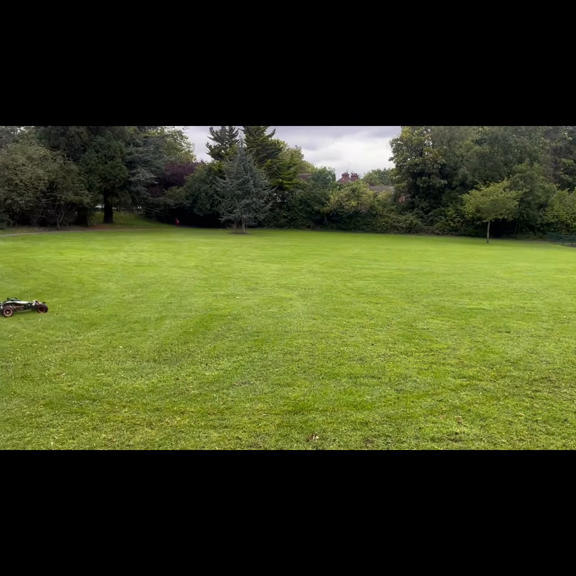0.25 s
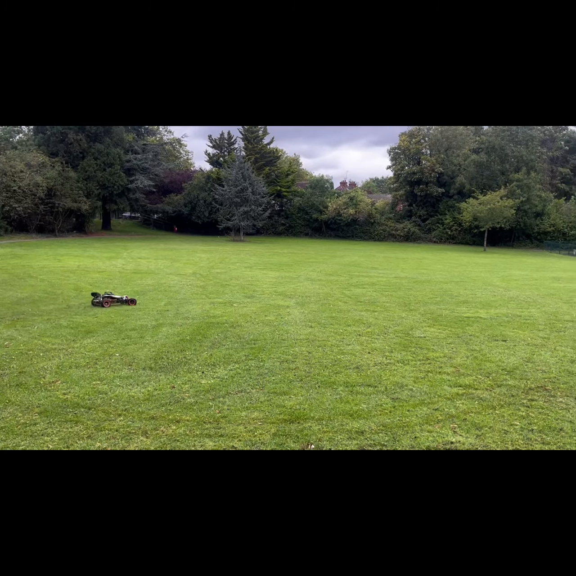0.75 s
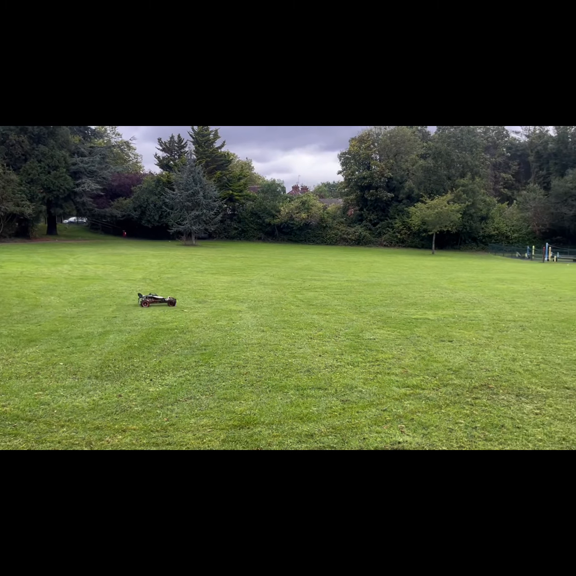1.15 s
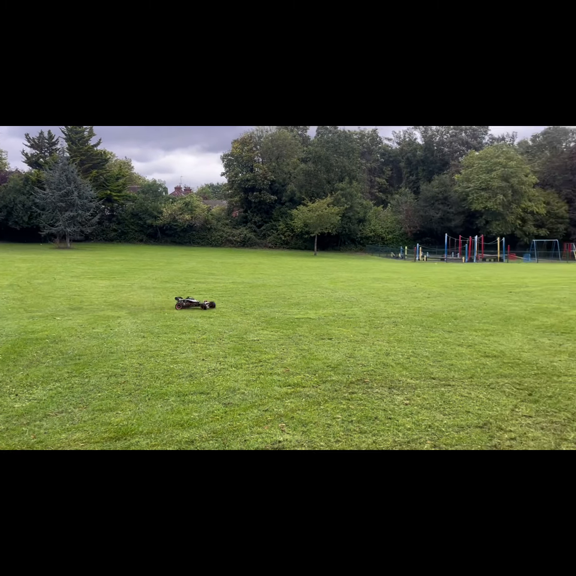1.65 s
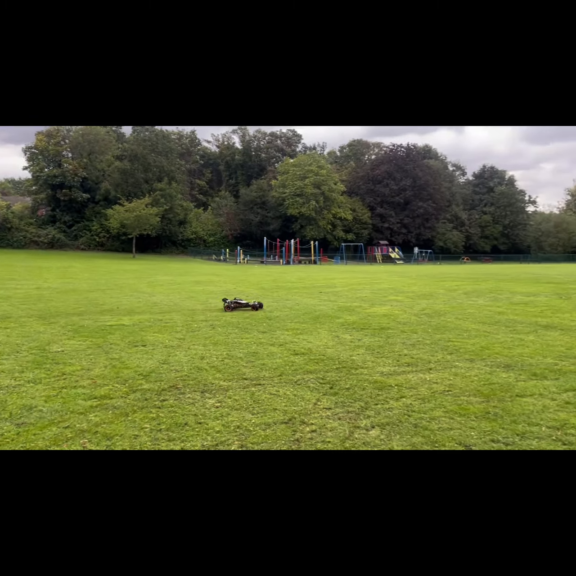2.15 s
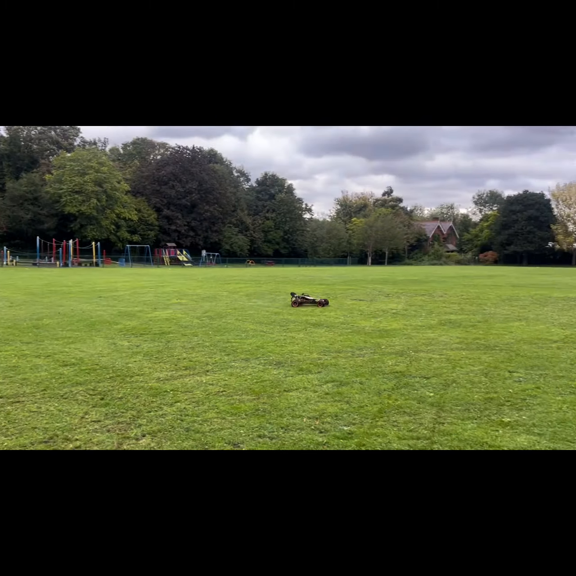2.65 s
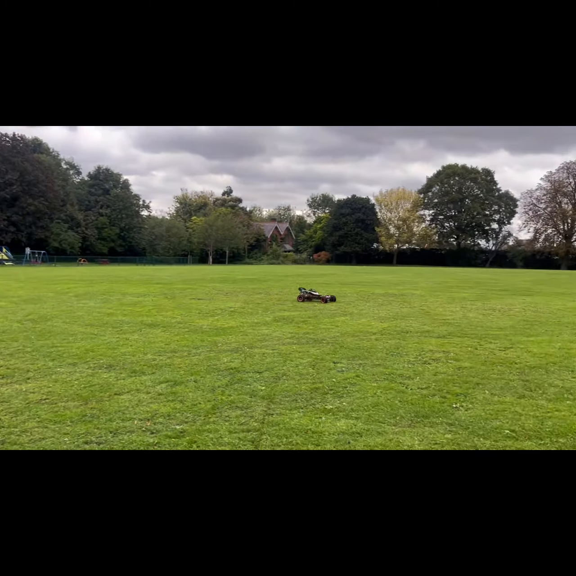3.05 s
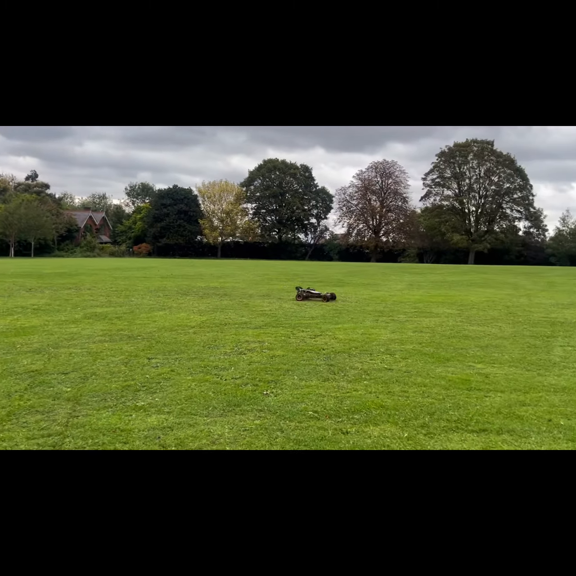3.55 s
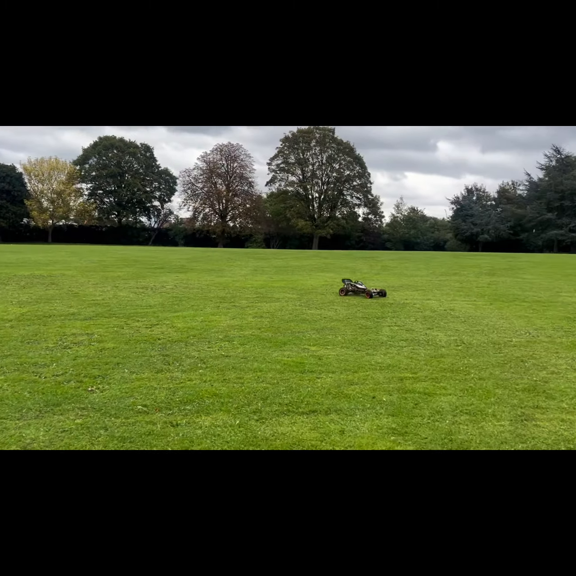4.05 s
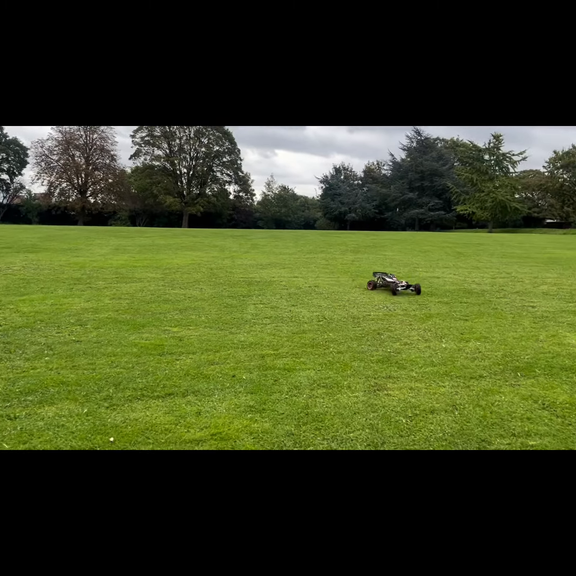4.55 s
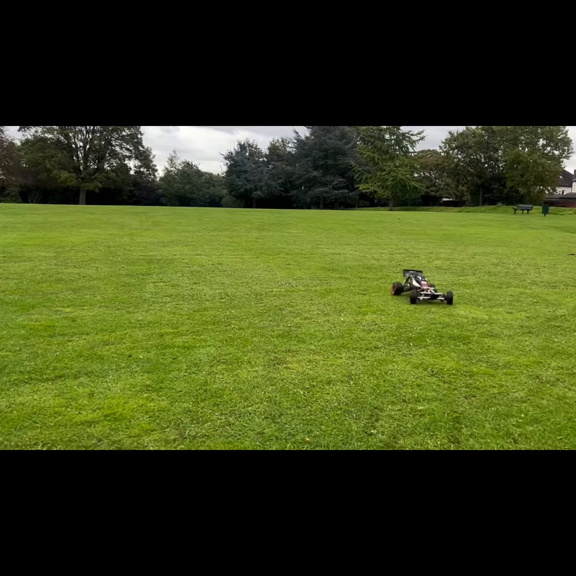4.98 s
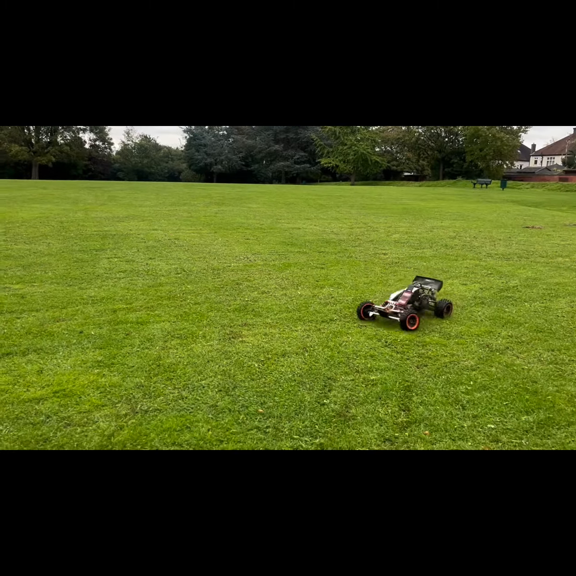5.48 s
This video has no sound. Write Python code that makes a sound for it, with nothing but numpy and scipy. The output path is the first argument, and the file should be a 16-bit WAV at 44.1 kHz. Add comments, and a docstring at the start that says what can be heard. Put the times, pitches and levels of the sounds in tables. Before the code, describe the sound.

Out in a field, the little petrol engine of a model buggy buzzes hard, eases off, then pulls up to its highest whine. It falls back, firing weakly and popping, gives three shorter barks of throttle, sputters again and opens up once more at the end. The sound is heard through a phone microphone, with a slight dull echo and faint far-off traffic underneath.

```python
"""Two-stroke model buggy on grass

A small petrol engine revs in six bursts as the buggy circles a field. Each firing cracks through the
resonances of the tuned pipe, which barks while revving up and howls under load. With the throttle shut
the engine coasts down, firing weakly and unevenly, with a few pops. The tree line answers faintly and
distant traffic hums. A phone's two microphone ports pick it up."""
import sys
import numpy as np
from scipy import signal
from scipy.fft import rfft, irfft, next_fast_len
from scipy.io import wavfile
from scipy.ndimage import map_coordinates

SR = 44100
rng = np.random.default_rng(int(sys.argv[2]) if len(sys.argv) > 2 else 0)


def to_wav(sig):
    """Store sig (one row per channel, or 1-D mono) as 16-bit WAV at the path in sys.argv[1].

    Samples outside -1..1 are clipped; the rate is SR.
    """
    pcm = np.clip(np.atleast_2d(sig), -1, 1) * 32767
    pcm = np.round(pcm).astype(np.int16)
    wavfile.write(sys.argv[1], SR, pcm.T)  # frames by channels


N = 252252


def amp(db):
    """Decibels to gain."""
    return 10 ** (np.asarray(db) / 20)


def unit(x):
    """Scaled to rms 1."""
    return x / np.sqrt(np.mean(x ** 2) + 1e-20)


def log_interp(hz_points, values, hz):
    """Values read on a log-frequency axis."""
    return np.interp(np.log(hz + 1), np.log(np.asarray(hz_points) + 1), values)


def curves(rows):
    """One value per sample for each column after the time."""
    times_s, *columns = np.transpose(rows)
    return [np.interp(np.arange(N) / SR, times_s, column) for column in columns]


def wobble(knots_per_s):
    """A smooth random curve."""
    knots = rng.standard_normal(int(N * knots_per_s / SR) + 4)
    return map_coordinates(knots, [np.arange(N) * knots_per_s / SR])


def filtered(x, response):
    """x through a complex frequency response."""
    size = next_fast_len(N + SR // 2)
    return irfft(rfft(x, size) * response(np.fft.rfftfreq(size, 1 / SR)), size)[..., :N]


def spikes(positions, sizes):
    """Band-limited pulses at fractional sample positions."""
    taps = np.floor(positions)[:, None] + np.arange(-7, 9)
    offset = taps - positions[:, None]
    shapes = sizes[:, None] * np.sinc(offset) * np.cos(np.pi * offset / 16) ** 2
    return np.bincount(np.clip(taps, 0, N).astype(int).ravel(), shapes.ravel(), N + 1)[:N]


def buggy():
    """One crankshaft drives the exhaust and the single voices of pipe and shell."""
    throttle, speed_hz, levels_db = driving()
    turns, clutch = crank(throttle, speed_hz)
    pulses = firings(turns, throttle)
    crack_db = levels_db[0]
    revving = throttle * np.clip((169.5 - speed_hz) / 20, 0, 1)  # gone by 169.5 Hz
    return (exhaust(pulses, turns, throttle, clutch, levels_db)
            + pipe_bark(pulses, revving, crack_db)
            + pipe_ring_on(pulses, throttle, crack_db)
            + pipe_howl(turns, speed_hz, loaded=throttle - revving)
            + shell(pulses))


# Each entry: time in seconds at which the throttle is fully open.
OPENINGS_S = [-.047, 1.036, 3.051, 3.7645, 4.363, 5.351]
# One burst per opening. Each row: time open in seconds, starting speed in Hz, opening crack offset
# in dB, quick speed drop on shutting in Hz, time constants of drop and coast in seconds, coasting
# crack at first and settled in dB, coasting thump, ring and hiss in dB over the crack.
BURSTS = [(.69, 103, 2, 18, 0.033, .39, -42.5, -56, -2.5, 5, -7),
          (1.222, 103, -15, 49, 0.08, 0.97, -35, -47, -9.5, -1.5, -11),
          (.442, 120, -13.5, 38, 0.049, 0.25, -42.5, -52, -7, -2, -8),
          (.134, 114, -9.5, 19, 0.07, 0.46, -46, -51.5, -6, 0.5, -8),
          (.232, 102, -17, 16, .04, 0.43, -46.5, -49.5, -2, 3, -22),
          (.5, 94, -13.5, 18, .04, .4, -45, -50, 0, 0, -15)]
# Each row: time in seconds, speed in Hz at which clutch and wheels hold the open engine.
HELD_SPEED = [(.07, 173.9), (.64, 170.7), (1.14, 172.9), (1.31, 171.3), (1.53, 180.2), (1.558, 189.2),
              (1.69, 199), (1.838, 201.4), (1.888, 210.1), (1.938, 206.9), (1.988, 217.3), (2.014, 208.5),
              (2.046, 231.1), (2.07, 226), (2.1, 231), (2.24, 234.6), (3.15, 170), (3.338, 182.4),
              (3.404, 189.7), (3.49, 195.6), (3.86, 169.8), (3.896, 166.1), (4.47, 176.4), (4.56, 175.3),
              (4.598, 166.5), (5.47, 175.6), (5.72, 176.2)]
# Open throttle. Each row: time in seconds, crack drive in dB, thump, ring and hiss in dB over it.
POWER_LEVELS = [(.1, -19.5, -13, -9, -6.5), (.37, -19.5, -15, -9.5, -10.5), (.55, -21.5, -11, -7, -6),
                (.65, -24.5, -18.5, -10, -9), (1.16, -21, -14, -10, -1.5), (1.38, -24.5, -11, -8.5, -7),
                (1.57, -24, -10.5, -7.5, -9), (1.88, -24, -7.5, -8.5, -12), (2.22, -17, -12, -12.5, -15),
                (2.26, -22, -16, -12, -12), (3.16, -26.5, -9, -4, -9), (3.48, -24, -12, -8, -8.5),
                (3.8, -27, -15, -8, -11), (3.89, -28.5, -15, -4.5, -7), (4.4, -22, -12.5, -9.5, -19),
                (4.51, -21.5, -14, -11, -9.5), (4.59, -24.5, -16.5, -13, -10),
                (5.46, -19.5, -7.5, -6.5, -14.5), (5.71, -25.5, -2.5, 3, -7)]
# Extra thump, ring and hiss in dB just after an opening.
SWELL_DB = [4.5, 6, 5]
def driving():
    """Throttle 0-1, crank speed and four drive levels: the engine climbs, is held, then coasts down."""
    climb_hz_per_s, knee_hz, idle_hz = 710, 3, 72.36
    open_s, shut_s, swell_s, sink_s = .0081, .024, .042, .24
    t = np.arange(N) / SR
    held_hz, = curves(HELD_SPEED)
    power_db = np.array(curves(POWER_LEVELS))
    throttle, speed_hz, levels_db = np.zeros(N), np.zeros(N), np.zeros((4, N))
    for start_s, burst in zip(OPENINGS_S, BURSTS):
        held_s, start_hz, first_db, drop_hz, drop_s, coast_s, from_db, to_db, *tone_db = burst
        age_s = t - start_s
        closed_s = np.maximum(age_s - held_s, 0)
        climb_hz = start_hz + climb_hz_per_s * age_s
        driven_hz = -knee_hz * np.logaddexp(-climb_hz / knee_hz, -held_hz / knee_hz)  # soft minimum
        top_hz = np.interp(start_s + held_s, t, driven_hz)
        coast_hz = idle_hz + drop_hz * np.exp(-closed_s / drop_s)
        coast_hz += (top_hz - drop_hz - idle_hz) * np.exp(-closed_s / coast_s)
        burst_hz = np.where(closed_s > 0, coast_hz, driven_hz)
        speed_hz = np.where(age_s < 0, np.maximum(speed_hz, driven_hz), burst_hz)
        opened = np.clip(age_s / open_s + 1, 0, 1) * np.clip(1 - closed_s / shut_s, 0, 1)
        loud_db = power_db + np.outer([first_db, *SWELL_DB], np.exp(-np.maximum(age_s, 0) / swell_s))
        sinking_db = to_db + (from_db - to_db) * np.exp(-closed_s / sink_s)
        quiet_db = np.array([sinking_db] + [np.full(N, db) for db in tone_db])
        levels_db = opened * loud_db + (1 - opened) * np.where(age_s < 0, levels_db, quiet_db)
        throttle = np.maximum(throttle, opened)
    levels_db[0] += 1.3 * (1 - throttle) * wobble(77)  # the coasting engine catches and misses
    return throttle, speed_hz, levels_db


def crank(throttle, speed_hz, grip_hz=175):
    """Crankshaft turns so far and clutch grip 0-1; bumps shake the speed while the clutch grips."""
    t = np.arange(N) / SR
    clutch = throttle * np.clip((speed_hz - grip_hz) / 8, 0, 1)
    turns = np.cumsum(speed_hz * (1 + .012 * clutch * wobble(50))) / SR + .5
    for start_s in OPENINGS_S[1:]:  # ease the phase so a firing lands on the opening
        phase = turns[round(start_s * SR)]
        turns += (np.round(phase) - phase) * np.clip((t - start_s) * 4 + 1, 0, 1)
    return turns, clutch


def firings(turns, throttle):
    """One pressure pulse a turn; a lean coasting charge burns less evenly."""
    positions = np.interp(np.arange(1, int(turns[-1]) + 1), turns, np.arange(N))
    chance = rng.standard_normal((2000, 2))[:len(positions)]
    shut = 1 - throttle[positions.astype(int)]
    jitter_s = (6e-6 + 20e-6 * shut) * chance[:, 0]
    scatter_db = (.63 + .25 * shut) * chance[:, 1]
    sizes = np.sqrt(np.gradient(positions)) * amp(scatter_db)
    return spikes(positions + SR * jitter_s, sizes)


# Pipe and body resonances in four groups. Each row: centre in Hz, width in Hz, then gain in dB
# side-on, driving away, coming closer and coasting.
THUMP_MODES = [(107.7, 42, 20, -23, -14, 25.5), (174, 135, 24.5, 21.5, 19, 15),
               (338, 183, 8.5, 6, 18.5, 13), (542, 40, 7, -33, 14.5, 16), (703, 146, 21, 10, 18, 13),
               (828, 83, 24.5, 13.5, 13, 7.5), (883, 27, -24, -10, -29, 15)]
RING_MODES = [(1264, 140, 19.8, -52, -22, -21), (1501, 107.4, 20.7, 23, 20.5, 23.5),
              (1745, 67, 20, 9.5, 13.5, 13.5), (1901, 56, 15, 11.5, 29.5, 6.5),
              (2282, 137, 22.7, 9, 20.5, 11)]
CRACK_MODES = [(2940, 320, 11.5, -18, 17, 9.5), (3465, 185, 10.7, 3, 4, 9.5),
               (3762, 550, 6.5, 12.5, 12.5, 11), (4310, 570, 4.8, 9, -44, 1),
               (4870, 470, 9.8, -18, -18, -32), (5640, 780, 4.7, -6, 6.5, -4),
               (6470, 470, 1.2, 15, -30.5, -1), (7510, 760, 6.7, 15, 0, 7.5)]
HISS_MODES = [(7300, 990, -10, -24, -17, -13), (9110, 880, 19, -23, 28, 5), (12000, 990, -12, 0, 10.5, -4),
              (14100, 1070, 0, 7.5, 5, 2)]
# Each row: time in seconds, exhaust heading (0 side-on, 1 driving away, 2 coming closer).
HEADING = [(0, 0.08), (.7, 0.073), (1.1, 0.25), (1.5, 0.94), (2.2, 1.156), (3.1, 0.96), (3.5, 1.12),
           (3.9, 1.01), (4.4, 1.33), (4.6, 1.62), (5.35, 1.49), (5.6, 1.86)]
# One row per group, in dB over the pulse. Each row: echoes open, echoes coasting, gas base, gas swing.
PULSE_BLUR = [(-19, -19, -44, -37), (-8, -7, -32, -28), (-3, 3, -18, -7.5), (-1, 5, -6, 7.5)]
# Stray coasting firings. Each row: time in seconds, relative level in dB.
POPS = [(2.583, -26), (2.6401, -20), (2.691, -24), (2.701, -23.5), (2.7916, -29), (2.836, -20.5),
        (2.8867, -28), (4.2321, -50), (4.2937, -36), (4.3402, -25), (5.007, -25.5), (5.078, -39),
        (5.167, -38), (5.1884, -27), (5.232, -25), (5.2673, -24), (5.3379, -19)]
def exhaust(pulses, turns, throttle, clutch, levels_db, load_db=7, pop_gain_db=6):
    """Firings, their echoes, gas noise and pops ring the four groups of resonances."""
    crack_db, thump_db, ring_db, hiss_db = levels_db
    heading, = curves(HEADING)
    echoes = near_echoes(pulses)
    gas = unit((3.2 + np.exp(-4 * (turns % 1))) * rng.standard_normal(N))  # peaks as the port opens
    pop_s, pop_db = np.transpose(POPS)
    pops = spikes(pop_s * SR, amp(pop_db + pop_gain_db))
    groups = [(THUMP_MODES, thump_db), (RING_MODES, ring_db), (CRACK_MODES, 0), (HISS_MODES, hiss_db)]
    out = np.zeros(N)
    for (modes, group_db), (open_db, coast_db, base_db, swing_db) in zip(groups, PULSE_BLUR):
        echo_gain = amp(throttle * open_db + (1 - throttle) * coast_db)  # a weak charge is blunter
        gas_gain = amp(throttle * base_db + (.5 - throttle) * swing_db + load_db * clutch)
        blurred = (pulses + echo_gain * echoes + gas_gain * gas) / np.sqrt(1 + echo_gain**2 + gas_gain**2)
        drive = amp(group_db) * (amp(crack_db) * blurred + pops)
        # Opposite phase hollows the gaps between neighbouring groups.
        out = resonate(drive, modes, heading, throttle) - out
    return out


def resonate(drive, modes, heading, throttle):
    """Each mode rings as heading and throttle allow; a band-pass confines the group."""
    out = np.zeros(N)
    for hz, width_hz, *facing_db, coast_db in modes:
        db = throttle * np.interp(heading, [0, 1, 2], facing_db) + (1 - throttle) * coast_db
        out += signal.lfilter(*signal.iirpeak(hz, hz / width_hz, SR), amp(db) * drive)
    edges_hz = [.8 * modes[0][0], 1.15 * modes[-1][0]]
    return signal.sosfilt(signal.butter(2, edges_hz, "bandpass", fs=SR, output="sos"), out)


def near_echoes(pulses, t60_s=.036, patterns=30):
    """Dense short echoes from pipe, shell and ground; their pattern drifts as the buggy moves."""
    t = np.arange(SR // 20) / SR
    steps = patterns - 1
    place = np.arange(N) / N * steps
    out = np.zeros(N)
    for k in range(patterns):
        response = rng.standard_normal(len(t)) * amp(-60 * t / t60_s) * (1 - np.exp(-t / .0028))
        start, end = max((k - 1) * N // steps, 0), min((k + 1) * N // steps, N)
        faded = pulses[start:end] * np.cos(np.pi / 2 * (place[start:end] - k))
        wet = signal.fftconvolve(faded, response / np.linalg.norm(response))[:N - start]
        out[start:start + len(wet)] += wet
    return out


def steep_resonance(pulses, hz, width_hz):
    """Picks out the firing overtones that pass through its band; rms 1."""
    b, a = signal.iirpeak(hz, hz / width_hz, SR)
    return unit(signal.lfilter(b, a, signal.lfilter(b, a, pulses)))


def pipe_bark(pulses, revving, crack_db):
    """A broad pipe resonance sounds while the engine revs up."""
    return revving * amp(crack_db - 9) * steep_resonance(pulses, hz=798, width_hz=320)


def pipe_ring_on(pulses, throttle, crack_db, decay_s=.29):
    """One resonance rings on and fades as the throttle shuts."""
    pole = np.exp(-1 / (decay_s * SR))
    just_shut = (1 - throttle) * signal.lfilter([1 - pole], [1, -pole], throttle)
    return just_shut * amp(crack_db - 2.5) * steep_resonance(pulses, hz=1733, width_hz=100)


def pipe_howl(turns, speed_hz, loaded, harmonic=4, db_per_hz=.36):
    """Under load the tuned pipe sings on one firing harmonic, louder with speed."""
    tone = -np.sqrt(2) * np.cos(2 * np.pi * harmonic * turns - np.pi / 4)
    return loaded * amp(-27 + db_per_hz * (speed_hz - 234)) * tone


# Each row: time in seconds, level in dB.
SHELL_LEVEL = [(4.5, -79), (4.95, -52), (5.2, -48), (5.34, -40), (5.4, -83)]
def shell(pulses):
    """The body shell rings along as the coasting buggy rolls close."""
    level_db, = curves(SHELL_LEVEL)
    return amp(level_db) * steep_resonance(pulses, hz=1046, width_hz=130)


def tree_line(engine, t60_s=.5, build_s=.052, cutoff_hz=5000):
    """Trees scatter back a late, dull stereo echo."""
    t = np.arange(SR // 2) / SR
    tail = rng.standard_normal((2, len(t))) * amp(-60 * t / t60_s) * (1 - np.exp(-t / build_s))
    wet = signal.fftconvolve(engine[None], tail / np.linalg.norm(tail[0]), axes=1)[:, :N]
    return filtered(wet, lambda hz: 1 / (1 + 1j * hz / cutoff_hz))


# Each row: frequency in Hz, relative noise density in dB.
TRAFFIC_SPECTRUM = [(25, -14), (45, -45), (90, 0), (130, -14), (400, -6.5), (1200, -18.5), (3000, -40),
                    (8000, -71), (15000, -69)]
def traffic(hum_hz=61, width_hz=5):
    """Distant traffic: a low hum wavers, swells and fades over a soft wash."""
    hz_points, db = np.transpose(TRAFFIC_SPECTRUM)
    wash = unit(filtered(rng.standard_normal(N), lambda hz: amp(log_interp(hz_points, db, hz))))
    hum = unit(filtered(rng.standard_normal(N), lambda hz: np.exp(-((hz - hum_hz) / width_hz) ** 2)))
    hum_db, = curves([(0, -37), (.6, -50), (1, -46), (2, -51.5), (3.5, -54.5), (5.72, -57.5)])
    return amp(hum_db) * hum + amp(-57 + 1.5 * wobble(3)) * wash


def scene():
    """Buggy and traffic in the centre; the trees answer from all round."""
    engine = buggy()
    return engine + traffic() + amp(-22) * tree_line(engine)


# Each row: frequency in Hz, left over right in dB, left phase lead in radians.
MIC_PORTS = [(60, -1, .2), (250, 0, .25), (520, 4.5, .4), (700, 4, .5), (1100, 10, 1), (1300, 5, 2),
             (1550, -3, 3), (1800, 0, -.2), (2300, 0, .1), (3300, 1, .6), (4900, 0, 0), (5700, -1, -.9),
             (6700, 1, -.9), (7900, 0, -np.pi), (9200, 0, -np.pi), (11000, 0, -2 * np.pi),
             (13000, 0, -2 * np.pi), (14500, 0, -3 * np.pi)]
def record(dry, ceiling=.92, top_hz=15757):
    """The phone's two ports differ in gain and phase; peaks are rounded off and the band is limited."""
    hz_points, db, lead_rad = np.transpose(MIC_PORTS)

    def port_responses(hz):
        left = amp(log_interp(hz_points, db, hz) / 2) * np.exp(.5j * log_interp(hz_points, lead_rad, hz))
        return np.array([left, 1 / left])

    ports = filtered(dry, port_responses)
    rounded = ports / (1 + np.abs(ports / ceiling) ** 5) ** (1 / 5)
    return filtered(rounded, lambda hz: hz < top_hz)


dry = scene()
out = record(dry)
to_wav(out)
```